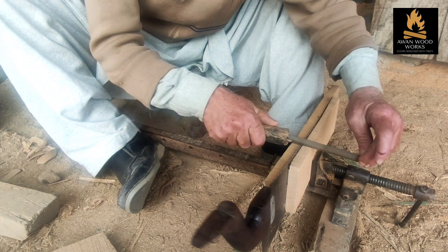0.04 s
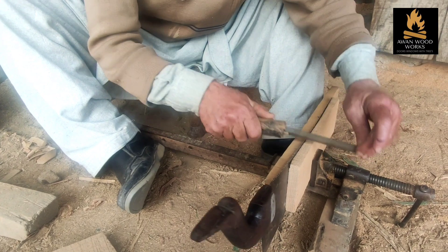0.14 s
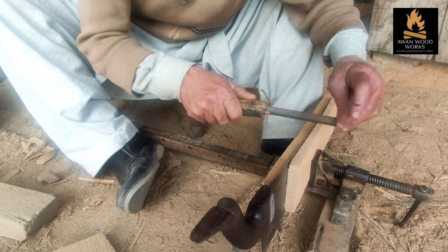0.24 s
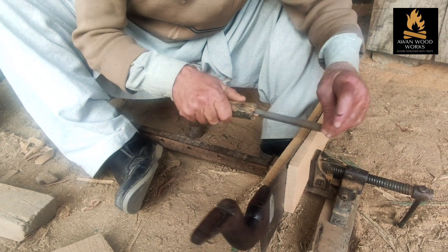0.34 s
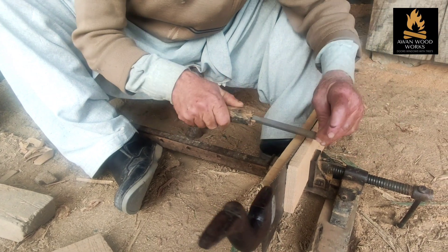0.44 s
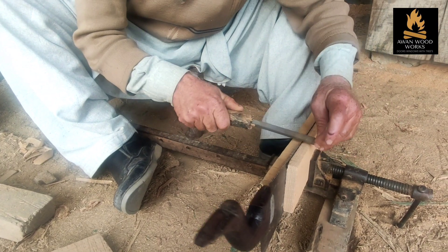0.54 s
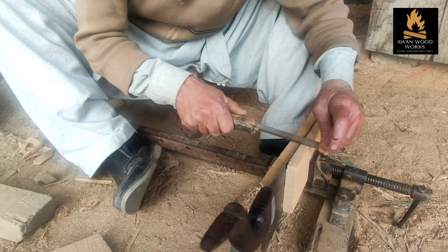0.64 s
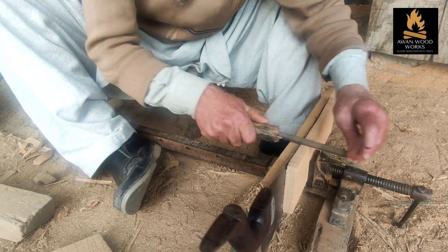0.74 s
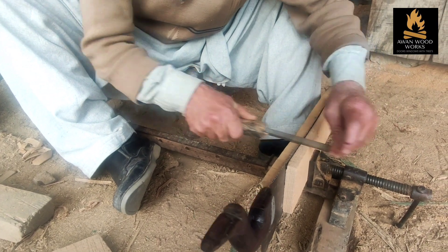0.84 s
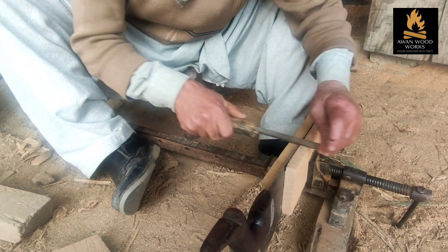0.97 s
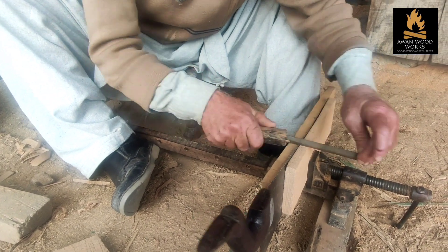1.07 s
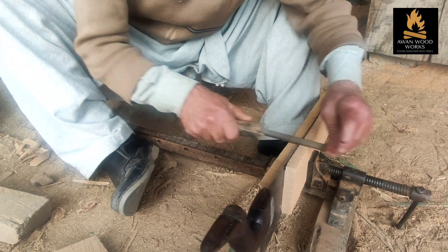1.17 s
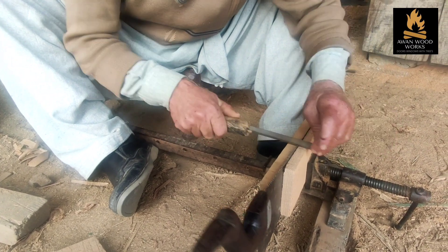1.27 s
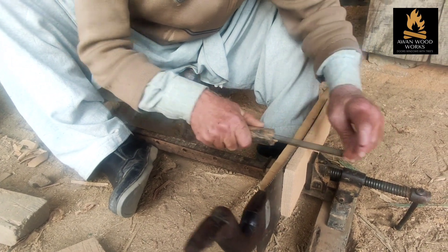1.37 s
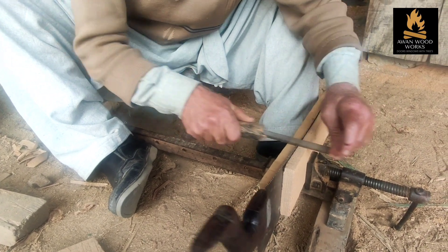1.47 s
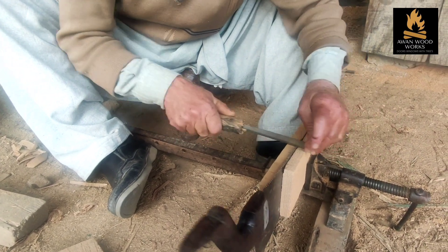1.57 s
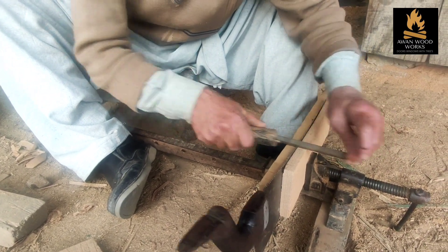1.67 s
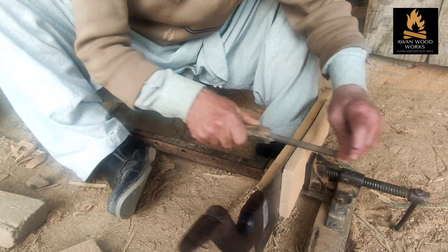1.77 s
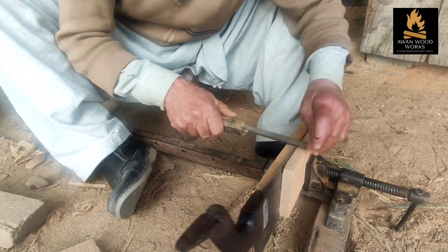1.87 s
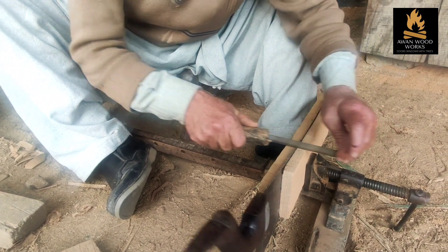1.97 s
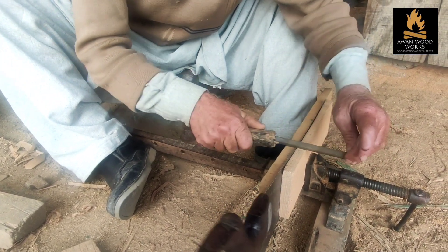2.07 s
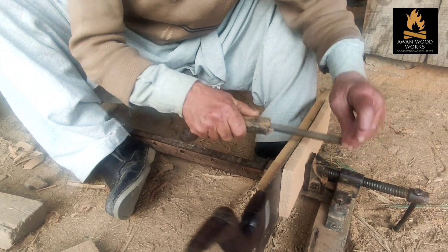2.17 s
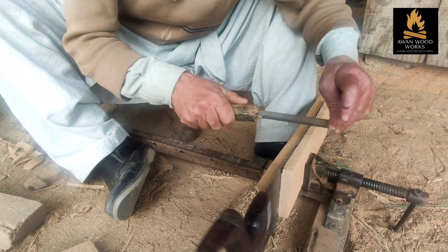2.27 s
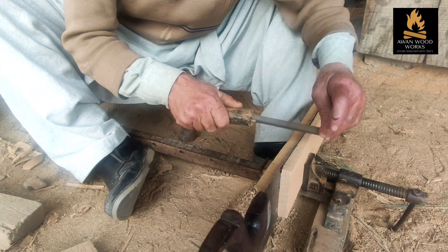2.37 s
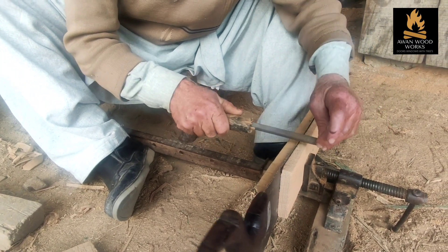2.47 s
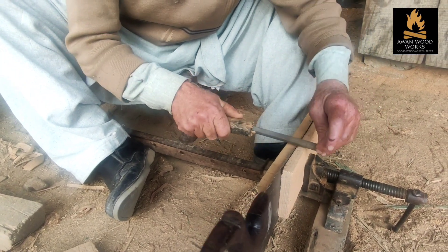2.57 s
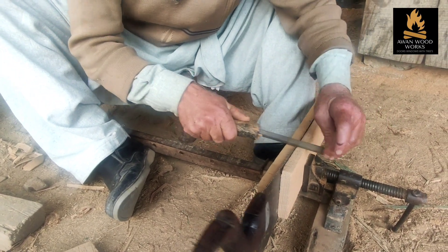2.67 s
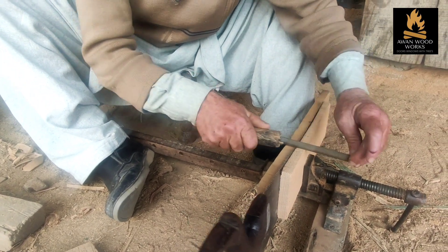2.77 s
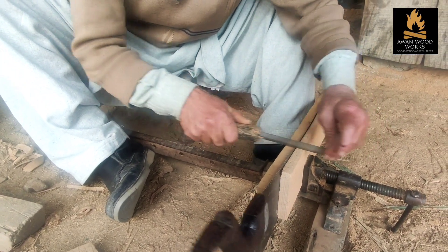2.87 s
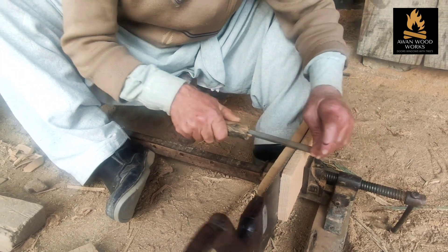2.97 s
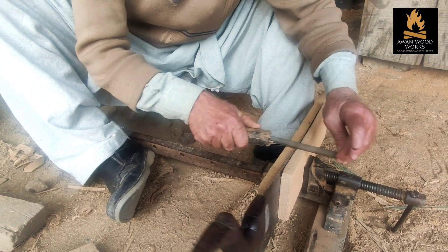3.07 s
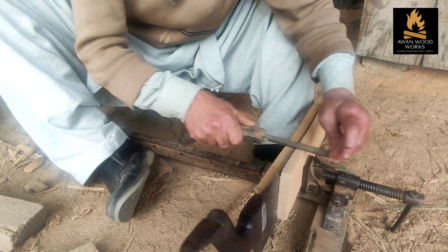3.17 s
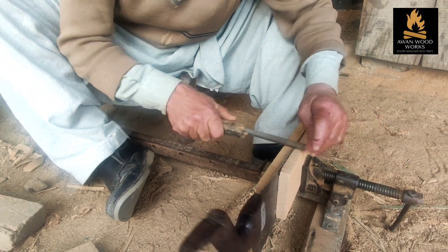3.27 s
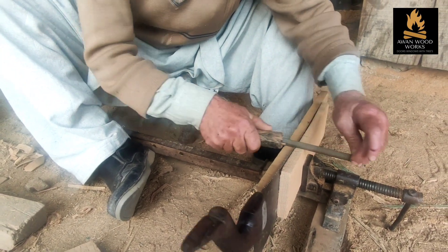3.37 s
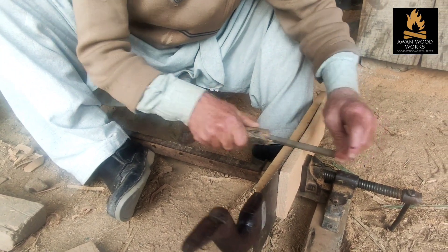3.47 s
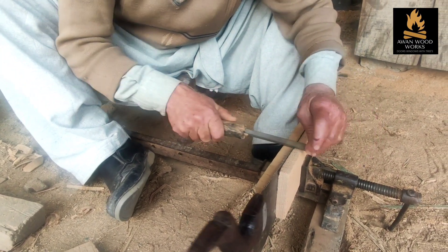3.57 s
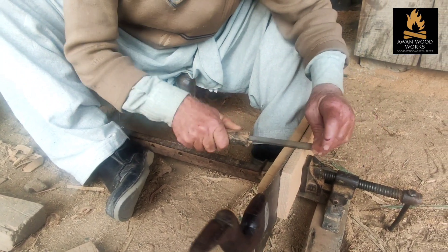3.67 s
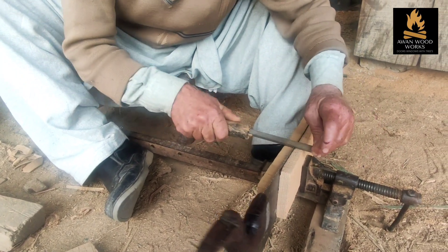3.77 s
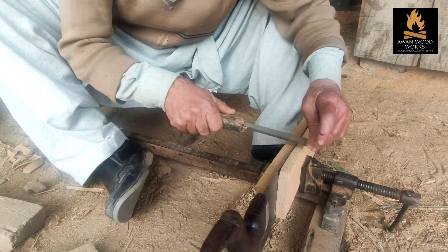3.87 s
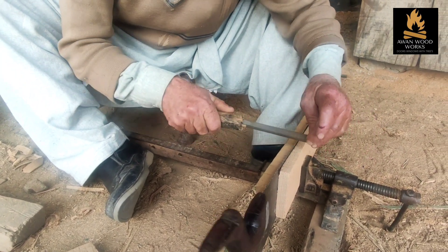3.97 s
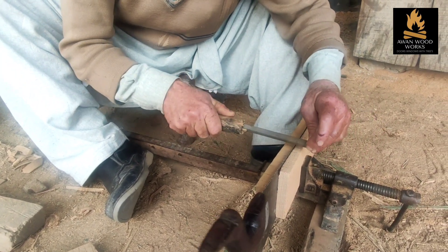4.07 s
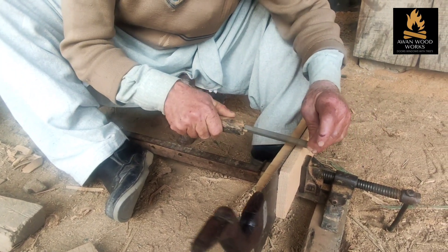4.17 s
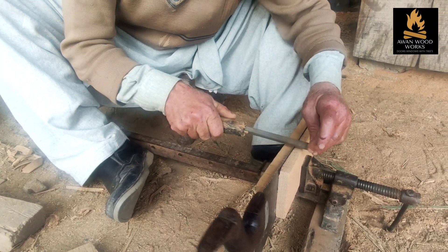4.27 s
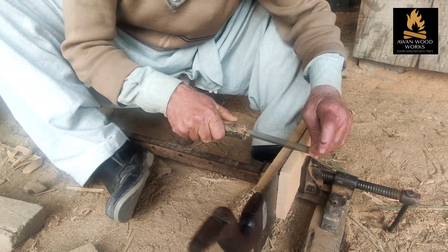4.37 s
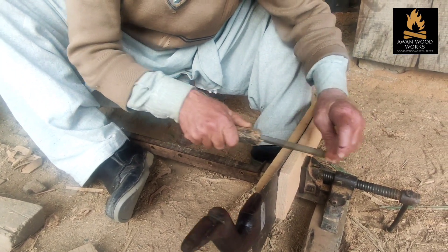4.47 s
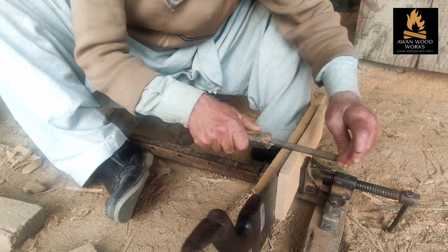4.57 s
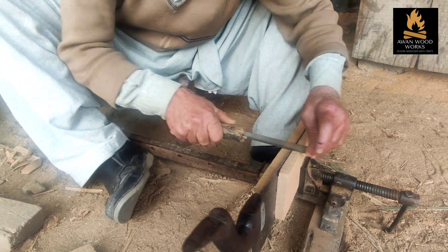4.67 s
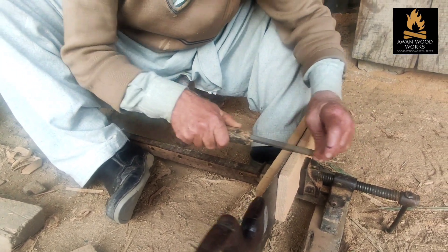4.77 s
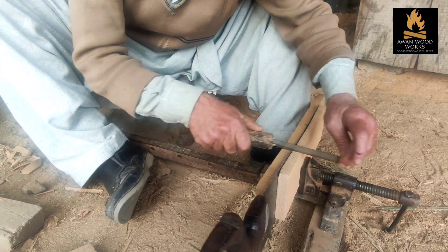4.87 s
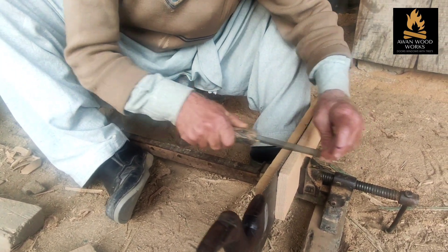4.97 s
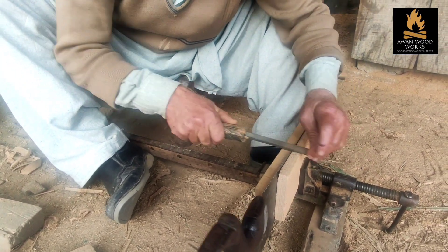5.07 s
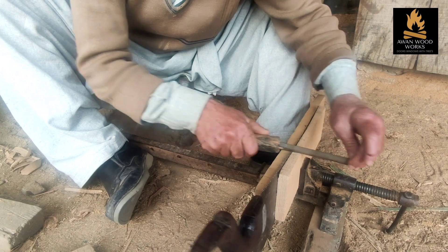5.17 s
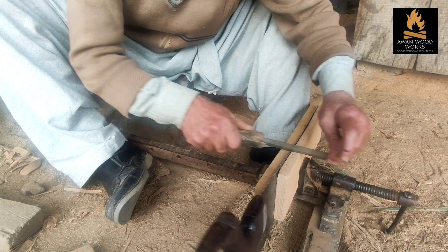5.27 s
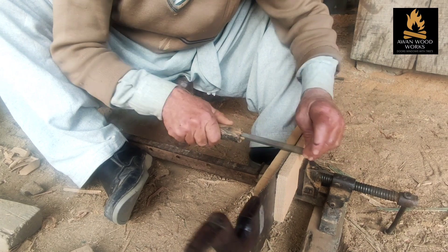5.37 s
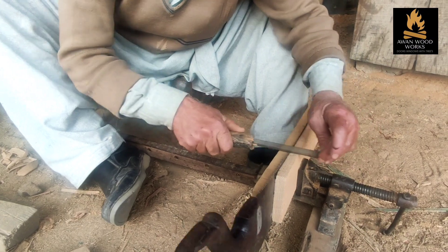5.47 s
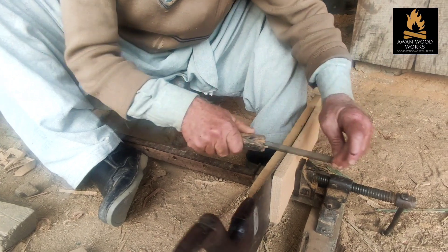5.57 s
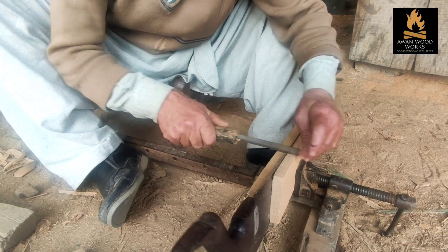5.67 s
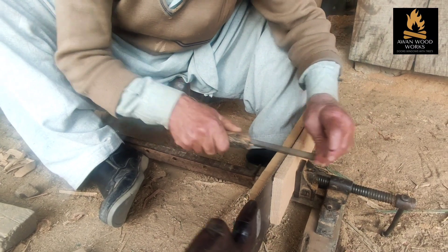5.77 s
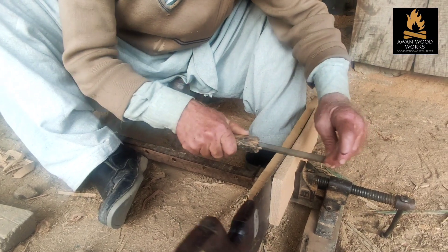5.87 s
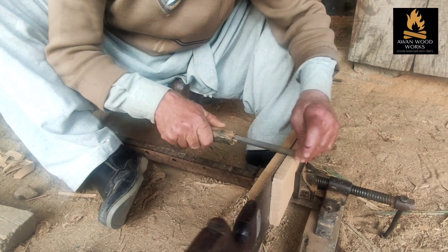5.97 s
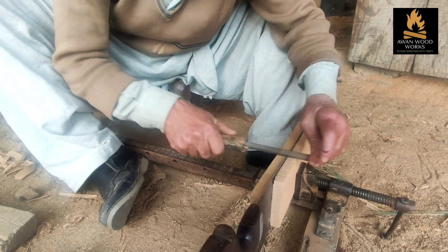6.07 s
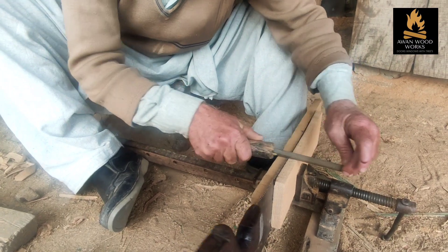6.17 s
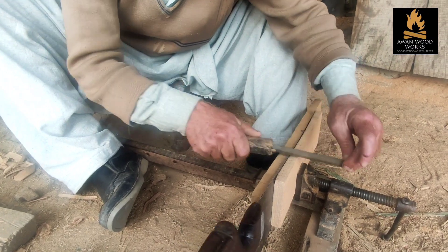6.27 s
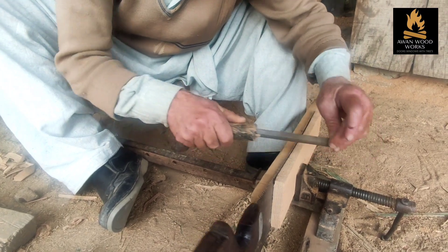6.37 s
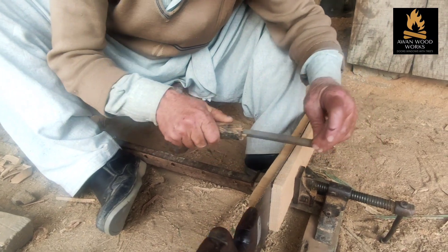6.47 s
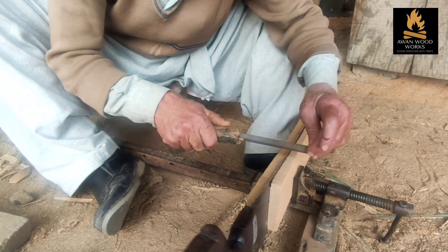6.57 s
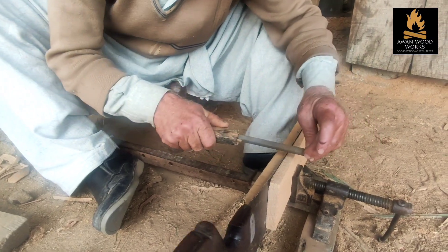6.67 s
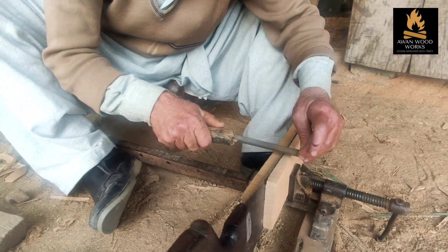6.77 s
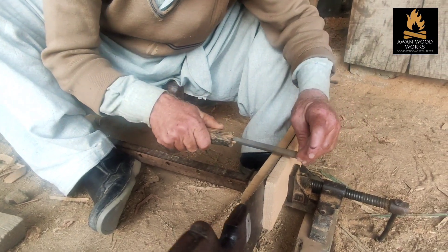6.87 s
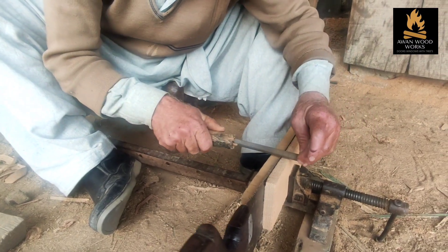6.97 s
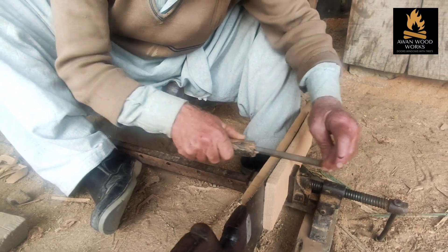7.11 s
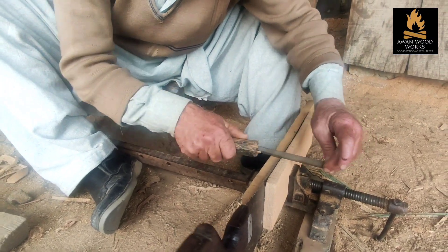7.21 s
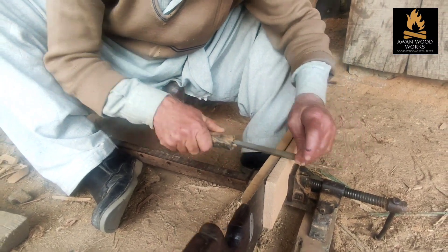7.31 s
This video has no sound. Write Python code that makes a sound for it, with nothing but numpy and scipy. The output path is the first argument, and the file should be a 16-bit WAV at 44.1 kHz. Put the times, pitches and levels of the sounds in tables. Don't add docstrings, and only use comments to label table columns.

```python
import sys
import numpy as np
from scipy import signal
from scipy.fft import rfft, irfft
from scipy.io import wavfile
from scipy.ndimage import uniform_filter1d

SR = 44100
rng = np.random.default_rng(int(sys.argv[2]) if len(sys.argv) > 2 else 0)


def volts_from_decibels(level):
    exponent = np.asarray(level, float) / 20
    return 10 ** exponent


def transcribe(u):
    v = np.clip(np.atleast_2d(u).T, -1, 1)
    q = np.round(v * 32767).astype(np.int16)
    wavfile.write(sys.argv[1], SR, q)


N = 323694
SIZE = 16384


def evened(x):
    return x / np.sqrt(np.mean(abs(x) ** 2) + 1e-20)


def read(points, hz):
    f, value = np.transpose(points)
    return np.interp(np.log(hz + 1), np.log(f + 1), value)


def add(mix, s, sound):
    part = mix[:, max(round(s * SR), 0):][:, :sound.shape[1]]
    part += sound[:, :part.shape[1]]


def wash():
    # (frequency [Hz], density [dB per Hz])
    colour = [(15, -62.5), (35, -36), (60, -11.5), (100, -7.5), (160, 2.5), (221, -18), (313, -5.5),
              (550, -18), (846, -16), (1500, -21.5), (3420, -25.5), (5500, -32), (10000, -37), (15400, -31)]
    # (frequency [Hz], left-right likeness [0 to 1])
    likeness = [(60, 0.23), (140, 0.31), (400, .12), (2000, .02)]
    frames, hz = N // 256 + 5, np.fft.rfftfreq(1024, 1 / SR)
    a, b, c, d, patches = rng.standard_normal((frames, 513, 5)).T
    patches = uniform_filter1d(patches, size=8, axis=0)
    patches = evened(uniform_filter1d(patches, size=14, axis=1))
    same = np.clip(read(likeness, hz), -1, 1)[:, None]
    left, other = a + 1j * b, c + 1j * d
    z = np.array([left, same * left + np.sqrt(1 - same ** 2) * other])
    z *= volts_from_decibels(read(colour, hz)[:, None] + 2.2 * patches)
    noise = signal.istft(z, nperseg=1024, noverlap=768)[1][:, :N]
    return volts_from_decibels(-60.5) * evened(noise)


def knock(db, hz, thud_db, t60=0.029, thud_hz=172, rattle_s=0.017):
    t = np.arange(6000) / SR
    ratios = ((0.91, 0.81), (2.1, 13), (0.65, 6.7), (1.4, 15))  # (share of hz, loss dB)
    modes = sum(volts_from_decibels(-loss) * np.sin(2 * np.pi * hz * m * t) for m, loss in ratios)
    blows = (rng.random((2, 6000)) < .02) * rng.standard_normal((2, 6000)) * np.exp(-t / rattle_s)
    blows[:, 0] = 2
    damped = volts_from_decibels(-60 * t / t60) * modes
    tap = signal.fftconvolve(blows, damped[None], axes=1)[:, :6000]
    thud = np.sin(2 * np.pi * thud_hz * t) * (1 - np.exp(-t / 0.005))
    thud = volts_from_decibels(thud_db + 9.0 - 60 * t / 0.1) * thud
    return volts_from_decibels(db - 5.0) * tap / abs(tap).max() + thud


def far_knocks(mix):
    # (time [s], peak level [dB], mode [Hz], thud level [dB])
    knock_events = [(2.221, -39, 1024, -51), (2.316, -54, 1540, -74), (2.435, -44, 1140, -65),
                    (2.536, -43.5, 1088, -62), (2.653, -45, 1053, -59), (3.932, -28, 1130, -48.5),
                    (3.947, -20, 1100, -39), (4.155, -53, 1120, -68), (3.72, -57, 1100, -49),
                    (5.549, -63, 1097, -35), (5.961, -74, 1080, -44), (6.142, -63, 1090, -38.5),
                    (6.37, -66, 1122, -61)]
    for s, *row in knock_events:
        add(mix, s, knock(*row))


def tick(db, hz, cycles=4.1):
    t = np.arange(200) / SR
    return np.tile(volts_from_decibels(db) * np.sin(2 * np.pi * hz * t) * np.exp(-t * hz / cycles), (2, 1))


def dry_ticks(mix):
    # (time [s], peak level [dB], frequency [Hz])
    tick_events = [
        (6.748, -54, 5500),
        (7.04, -66, 8200),
        (3.935, -36, 2600),
        (2.698, -48, 3000),
    ]
    for s, *row in tick_events:
        add(mix, s, tick(*row))


def catch(db, low_hz, top_hz):
    t = np.arange(900) / SR
    band = signal.butter(3, (low_hz, top_hz), "band", fs=SR, output="sos")
    grit = signal.sosfilt(band, rng.standard_normal((2, 900)))
    return volts_from_decibels(db - 5) * evened(grit) * np.exp(-t / .005)


def ridge_catches(mix):
    # (time [s], peak level [dB], dullest [Hz],
    # brightest [Hz])
    catch_events = [(1.5603, -14, 1500, 15000), (3.0815, -23, 3500, 10000), (3.272, -25, 2000, 8000),
                    (3.553, -17, 1000, 5500), (5.348, -23, 1500, 7000), (5.699, -24, 1500, 8000),
                    (5.9995, -21, 1000, 7000), (1.064, -24, 4000, 12000), (2.939, -20, 1500, 7000),
                    (3.9335, -26, 1200, 4000), (3.9485, -29, 1200, 4500), (3.9425, -35, 1000, 4000),
                    (6.748, -52, 3500, 9000), (7.1215, -27, 1200, 6000), (4.157, -54, 800, 3000),
                    (.741, -25, 1200, 6000),
                    (2.6975, -43, 1000, 9000), (4.697, -26, 5000, 15100), (4.842, -21, 2500, 12160),
                   (3.655, -14, 1500, 5070), (0.759, -23, 1000, 5050), (.9492, -11, 1000, 6000),
                   (1.0779, -18.5, 1000, 6120), (1.8776, -23, 800, 2940), (2.7232, -38, 1000, 5000),
                   (2.7487, -24, 1000, 5000), (2.8055, -16, 2000, 6000), (3.02, -10, 2020, 6130),
                   (3.717, -19, 2000, 11920), (4.504, -41, 1000, 3000), (4.5406, -21, 1000, 6000),
                   (4.7091, -16, 1000, 4000), (4.9696, -14.5, 1000, 5030), (5.0676, -25, 1000, 6000),
                   (5.191, -18, 1000, 5900), (5.842, -8.5, 1000, 6030), (6.134, -20, 1000, 6000),
                   (7.0863, -45.5, 1000, 3000), (7.103, -41, 1000, 4030), (7.188, -22, 1000, 6000)]
    for s, *row in catch_events:
        add(mix, s, catch(*row))


def squeal(db, hz, length_s, width_share=0.08, climb=0.076, rise_s=0.0023, steady=0.63,
           throb=0.21, throb_hz=140, size=8820):
    t = np.arange(0, 2 * length_s, 1 / SR)[:size]
    r = np.exp(-np.pi * width_share * hz / SR)
    fuzz = rng.standard_normal((2, size)) + 1j * rng.standard_normal((2, size))
    fuzz = signal.lfilter([1], [1, -2 * r, r * r], fuzz)
    fuzz = evened(fuzz[:, -len(t):] + 0j)
    turns = hz * np.cumsum(1 + climb * (np.minimum(t / length_s, .8) - .4)) / SR
    shape = (1 - np.exp(-t / rise_s)) ** 2 * np.exp(-(t / length_s) ** 1.4 * 2.0)
    shape = shape * (1 + throb * np.sin(2 * np.pi * throb_hz * rng.uniform(0.68, 0.82) * t))
    return volts_from_decibels(db - 3.5) * shape * ((fuzz + steady) * np.exp(2j * np.pi * turns)).real


def whistles(mix):
    # (time [s], peak level [dB], frequency [Hz], length [s])
    whistle_events = [
        (6.56, -63, 861, .3),
        (6.78, -65, 850, .18),
        (6.58, -64, 1770, .2),
        (6.8, -64, 1450, .15),
        (6.72, -66, 3010, .17),
        (6.74, -69, 2730, .2),
        (6.36, -58, 2150, .1),
        (7.02, -62, 3010, .06),
        (0.3, -67, 860, .2),
        (6.39, -55, 3230, .1),
    ]
    for s, *row in whistle_events:
        add(mix, s, squeal(*row, width_share=0.022, climb=0.0074, rise_s=0.014, throb=0, size=28000))


def chatter(mix):
    # (time [s], peak level [dB], frequency [Hz], length [s])
    low_squeals = [(0.0, -17, 3416, 0.059), (1.075, -9, 3400, 0.061), (1.3997, -7, 3490, 0.05),
                   (1.715, -9, 3272, 0.06), (2.028, -10, 3400, 0.055), (3.085, -10, 3590, 0.057),
                   (3.406, -8.5, 3550, 0.062), (5.189, -11, 3490, 0.05), (5.5057, -7, 3730, 0.041),
                   (5.8452, -12, 3405, 0.05), (6.14, -14, 3570, 0.05)]
    mid_squeals = [
        (3.43, -16, 5400, .05),
        (0.0, -12, 5330, 0.05),
        (1.7201, -11, 4750, 0.05),
        (3.088, -11, 5416, 0.065),
        (4.8765, -16, 5360, 0.05),
        (5.5416, -14.5, 5430, 0.05),
        (5.85, -15, 5015, 0.04),
    ]
    high_squeals = [
        (0.0, -8, 8760, 0.043),
        (1.3966, -13, 8830, 0.088),
        (1.717, -14, 7840, 0.08),
        (3.1017, -10.5, 8410, 0.064),
        (4.857, -14.5, 8530, 0.083),
        (5.201, -18, 7940, 0.073),
        (5.5098, -14, 8935, 0.052),
        (5.868, -24, 7420, 0.039),
        (6.1614, -11, 8940, 0.041),
    ]
    upper_squeals = [
        (3.095, -25, 10700, .04),
        (3.085, -18, 9250, .03),
        (6.4, -56, 3220, .08),
    ]
    stall_squeals = [
        (3.715, -7, 3660, .035),
        (3.716, -11, 5450, .04),
        (3.715, -8, 8700, .032),
        (3.75, -33, 5500, .05),
        (3.706, -17, 1700, .035),
        (3.716, -19, 10850, .04),
        (3.716, -20, 12800, .035),
    ]
    rough_squeals = [(3.008, -7.5, 4000, 0.019), (2.028, -12, 3600, .04), (7.08, -37.5, 1450, 0.041),
                     (5.8, -36, 1400, 0.038), (3.635, -22, 590, 0.037), (0.021, -11, 3700, .05),
                     (1.095, -9.5, 3200, 0.059), (2.05, -9, 3800, .05), (3.423, -10.5, 4000, .06),
                     (7.192, -5.5, 5100, 0.05), (7.195, -10.5, 1252, 0.045)]
    afterglow = [
        (3.759, -41, 8640, 0.074),
        (3.76, -48, 10900, 0.073),
        (3.76, -48, 12800, .07),
        (3.769, -50, 7030, 0.12),
        (3.94, -49, 8770, 0.035),
    ]
    for s, *row in upper_squeals + low_squeals + mid_squeals + high_squeals:
        add(mix, s, squeal(*row))
    for s, *row in stall_squeals:
        add(mix, s, squeal(*row, climb=0, rise_s=.001, width_share=.05, throb=.5, throb_hz=115))
    for s, *row in rough_squeals + afterglow:
        add(mix, s, squeal(*row, width_share=0.24))


def dying_noise(t60_table, delay_s):
    hz, t, z = signal.stft(rng.standard_normal((2, SIZE)), SR, nperseg=128)
    decay = volts_from_decibels(-60 * t / read(t60_table, hz)[:, None])
    burst = signal.istft(z * decay, SR, nperseg=128)[1][:, :SIZE]
    spectra = rfft(np.roll(burst, round(delay_s * SR), axis=1))
    return spectra / np.sqrt(uniform_filter1d(abs(spectra) ** 2, size=50, axis=1))


def body(room_db=-20, room_t60=0.03):
    # (frequency [Hz], density [dB per Hz])
    colour = [(24, -71), (40, -50), (123, -44.5), (178, -19.5), (279, -24.5), (416, -12), (600, -11.5),
              (879, -12.5), (995, -6.5), (1560, -5), (1900, -4.5), (3370, -1.5), (5150, -2.5), (5690, -3.5),
              (8480, -9.5), (15400, -21.5)]
    # (frequency [Hz], width [Hz], level [dB])
    board_modes = [(195, 300, -7), (317, 20, 1.5), (419.7, 22, 6), (506, 22, 3), (622, 89, 2.5),
                   (1029, 59, 3.5), (1150, 62, -1), (1325, 280, 3), (1548, 40, 10), (1625, 110, 3.5),
                   (1750, 67, 2)]
    # (frequency [Hz], width [Hz], level [dB])
    steel_modes = [(2424, 76, 5), (2930, 140, 5), (3103, 90, 0), (3307, 60, 2), (3740, 880, 1),
                   (4660, 170, 1.5), (4990, 110, 3.5), (5270, 81, 8.5), (5990, 30, 3.5), (6390, 110, -2.5),
                   (7880, 110, 4), (8380, 120, 4), (10040, 410, -6), (11450, 90, 1.5)]
    # (frequency [Hz], width [Hz], level [dB])
    valleys = [(203, 43, -6), (378, 72, -6.5), (301, 5.1, -13), (870, 510, -1.5), (1874, 65, -7),
               (4140, 220, 0), (5770, 690, -5), (7000, 120, -6), (9250, 32, -0.5), (11220, 260, -7)]
    # (frequency [Hz], t60 [s])
    ring_t60 = [(200, 0.16), (1500, 0.096), (5000, 0.068), (12000, 0.031)]
    # (frequency [Hz], left-right likeness [0 to 1])
    likeness = [(60, 0.29), (150, 0.94), (380, 0.96), (950, 0.31), (2380, 0.19), (5970, 0.39),
                (15000, 0.93)]
    # (frequency [Hz], left minus right [dB])
    tilt = [(60, 3.5), (120, -8.5), (240, 4), (480, 2.5), (950, 2), (1890, 1.5), (3770, 0.5), (7510, -1),
            (15000, 3)]
    wander, narrowest_hz = .025, 18
    direct_db, direct_from_hz, lag_s = -1, 700, [5.5e-5, 0]
    hz = np.fft.rfftfreq(SIZE, 1 / SR)
    ring = dying_noise(ring_t60, 0)
    for f, width, db in board_modes + steel_modes:
        phase = rng.uniform(0, 2 * np.pi, (2, 1))
        spot_db = 2.5 * rng.standard_normal()
        f = f * (1 + wander * np.clip(f / 1500, 0, 1) * rng.standard_normal())
        resonance = 1 / (1 + 2j * (hz - f) / max(width, narrowest_hz))
        ring = ring + volts_from_decibels(db + spot_db) * np.exp(1j * phase) * resonance
    ring = ring + volts_from_decibels(room_db) * dying_noise([(100, room_t60), (15000, 0.25 * room_t60)], 0.0036)
    same = np.clip(read(likeness, hz), 0, 1)
    ring = np.array([ring[0], same * ring[0] + np.sqrt(1 - same ** 2) * ring[1]])
    direct = volts_from_decibels(direct_db) / (1 + (direct_from_hz / (hz + 1)) ** 4)
    ring = ring + direct * np.exp(-2j * np.pi * np.outer(lag_s, hz))
    for f, width, db in valleys:
        ring = ring * volts_from_decibels(db * np.exp(-((hz - f) / width) ** 2))
    return hz, ring * volts_from_decibels(read(colour, hz) + np.outer([.5, -.5], read(tilt, hz)))


def stroke(start_s, hold_s, bite_s, lift_db_per_s, held_db):
    lift_shares = (1.1, 1.1, 1.9, 2.8)
    at_once = 0.28
    t = np.arange(0, hold_s + .15, 1 / SR)
    bite = at_once + (1 - at_once) * np.sin(np.pi / 2 * np.minimum(t / bite_s, 1)) ** 2
    lift_db = -lift_db_per_s * np.outer(lift_shares, np.maximum(t - hold_s, 0))
    gain = bite * volts_from_decibels(held_db(np.minimum(t / hold_s, 1)) + lift_db)
    return start_s, gain[:, max(-round(start_s * SR), 0):] ** 2


def pressure():
    # (bite [s], hold [s], pressure [dB], sag over the hold [dB], lift [dB per s])
    pushes = [(-0.02, 0.17, -26, 13.5, 900.5), (1.066, 0.136, -23, 10, 603),
              (1.388, 0.13, -23.5, 16, 694.5), (1.705, 0.13, -22.5, 11, 502), (2.016, 0.12, -24, 16, 518),
              (3.082, 0.16, -25.5, 8.5, 1198), (3.387, 0.13, -23, 10.5, 797),
              (3.689, 0.042, -26.5, -12, 607), (4.846, 0.1, -24.5, 2.5, 902), (5.184, 0.11, -22.5, 7, 594),
              (5.504, 0.15, -23.5, 7.5, 1198), (5.835, 0.1, -24, 17, 541), (6.127, 0.084, -22, 16, 491),
              (7.185, 0.098, -26, 9.5, 912), (7.322, 0.24, -26, -10.5, 700)]
    # (bite [s], hold [s], pressure [dB], swell [dB], brightness [dB])
    draws = [(0.078, 0.062, -25.5, 4.5, 4), (0.737, 0.15, -21.5, 15, 2.5), (0.924, 0.11, -20, 9, 1.5),
             (1.223, 0.13, -20, 12, 1), (1.559, 0.12, -21.5, 5.5, 0.5), (1.86, 0.12, -20, 8.5, 0),
             (2.739, 0.15, -23.5, 36, 2.5), (2.928, 0.11, -20, 9, 0.5), (3.272, 0.092, -22.5, 2, 1),
             (3.551, 0.12, -21, 6.5, 0.5), (4.531, 0.12, -22.5, 2.5, 1.5), (4.685, 0.15, -23.5, 11.5, 0.5),
             (4.958, 0.052, -20, -1, 1), (5.051, 0.1, -20.5, 8.5, 1.5), (5.343, 0.12, -20.5, 6.5, 1),
             (5.696, 0.12, -22, 4.5, -0.5), (5.995, 0.11, -21.5, 12.5, 0), (6.215, 0.11, -23.5, 2, -1)]
    # (start [s], length [s], first [dB], last [dB], brightness [dB])
    touches = [(5.94, 0.0484, -41.5, -56, 3), (1.37, .02, -35.5, -33, 1), (0.175, 0.19, -46.5, -79.5, 0.5),
               (0.696, 0.054, -56.5, -38.5, 0), (2.154, 0.11, -55, -72, 5), (2.267, 0.07, -65, -66, 0),
               (2.695, 0.074, -47.5, -27.5, -0.5), (3.775, 0.15, -59, -73, 3.5),
               (3.92, 0.041, -47, -38.5, -3.5), (3.989, 0.077, -77, -68, -3.5),
               (4.491, 0.038, -54.5, -40.5, 0.5), (4.841, 0.0086, -32, -44, 4),
               (6.328, 0.21, -37, -89.5, 3), (6.58, 0.21, -73.5, -71, -2), (6.752, 0.201, -71.5, -65.5, -3),
               (7.074, 0.055, -57, -32, -1), (7.121, 0.1, -41.5, -16, -0.5)]
    # (clamp, boards, blade, file); colours [dB], the others shares [ratio]
    push_colour = (-8, 1.66, 4, 2.72)
    push_sag = (-0.079, 0.7, 1, 0.91)
    draw_colour = (-6.5, 1.7, 3, -2)
    draw_swell = (0.55, 1.2, 1.7, 1.8)
    draw_bright = (-1.4, 1.5, 2, 1.8)
    touch_colour = (-14.5, 1.5, -1.5, -10.5)
    touch_bright = (-3, 0.5, 1.72, 3)
    top, droop_db = 0.63, 2.5
    power = np.full((4, N), 1e-11)

    for s, hold_s, db, sag_db, lift in pushes:
        def push_db(u):
            return db + np.reshape(push_colour, (4, 1)) + sag_db * np.outer(push_sag, .5 - u)
        add(power, *stroke(s, hold_s, 0.012, lift, push_db))

    for s, hold_s, db, swell_db, bright_db in draws:
        def draw_db(u):
            colour_db = np.reshape(draw_colour, (4, 1)) + bright_db * np.reshape(draw_bright, (4, 1))
            swell = swell_db * np.outer(draw_swell, np.maximum(1 - u / top, 0) ** 2)
            droop = droop_db * (np.maximum(u - top, 0) / (1 - top)) ** 2
            return db + colour_db - swell - droop
        add(power, *stroke(s, hold_s, .0025, 899.5, draw_db))

    for s, hold_s, first_db, last_db, bright_db in touches:
        def touch_db(u):
            colour_db = np.reshape(touch_colour, (4, 1)) + bright_db * np.reshape(touch_bright, (4, 1))
            return colour_db + first_db + (last_db - first_db) * u
        add(power, *stroke(s, hold_s, 0.0026, 746.5, touch_db))
    return np.sqrt(power)


def rasp(clicks_per_s=9000, spread_db=3.0, judder_db=1.0, grit_db=1.5, slide_per_s=7.0,
         alike=(.9, .8, .62, .5)):
    hits = rng.random((2, N)) < clicks_per_s / SR
    clicks = hits * volts_from_decibels(spread_db * np.minimum(rng.exponential(1, (2, N)), 5))
    judder = uniform_filter1d(rng.standard_normal(N), size=300)
    judder = evened(uniform_filter1d(judder, size=300))
    grit = evened(uniform_filter1d(rng.standard_normal(N), size=60))
    signs = rng.choice([-1, 1], (2, N))
    near, far = evened(clicks * signs * volts_from_decibels(judder_db * judder + grit_db * grit))
    slide = np.pi * slide_per_s * np.arange(N) / SR
    gains, out = pressure(), np.zeros((2, N))
    for spot in range(4):
        hz, response = body()
        share = np.sqrt(2 / 4) * np.cos(slide - spot * np.pi / 4)
        deep, low, high = (1 / (1 + (hz / edge_hz) ** 12) for edge_hz in (850, 2100, 5700))
        bands = (deep, low - deep, high - low, 1 - high)
        for gain, band, same in zip(gains, bands, np.clip(alike, 0, 1)):
            drive = np.array([near, same * near + np.sqrt(1 - same ** 2) * far]) * share * gain
            taps = np.roll(irfft(evened(response * band)), 768, axis=1)[:, :SIZE // 2]
            out += signal.oaconvolve(drive, taps, axes=1)[:, 768:N + 768]
    return out


def scene():
    mix = wash()
    far_knocks(mix)
    whistles(mix)
    dry_ticks(mix)
    ridge_catches(mix)
    chatter(mix)
    return mix + rasp()


def starved(x, from_hz=1500, edge_hz=15150, patchy_db=2.5):
    # (frequency [Hz], width [Hz], lost margin [dB])
    weak_bands = [(5800, 250, 0), (8900, 200, 1.5), (11250, 330, 7), (12900, 1600, 5.5)]
    margin_db, chance_db, lean_db = 8.5, 3.2, 2.3
    hz, t, z = signal.stft(x, SR, nperseg=1024, noverlap=768)
    column_hz = hz[:, None]
    blocks = rng.standard_normal((len(t) // 4 + 1, len(hz) // 6 + 1)).T
    blocks = evened(uniform_filter1d(blocks, size=3, axis=1))
    chance = np.kron(blocks, np.ones((6, 4)))[:len(hz), :len(t)]
    drift = rng.standard_normal((len(t), len(hz))).T
    drift = uniform_filter1d(drift, size=9, axis=0)
    drift = evened(uniform_filter1d(drift, size=14, axis=1))
    power = uniform_filter1d((abs(z) ** 2).sum(0), size=5, axis=0)
    power = uniform_filter1d(power, size=10, axis=1) + 1e-16
    dip_db = 10 * np.log10(power / uniform_filter1d(power, size=40, axis=0))
    treble = np.clip(.62 * np.log2((column_hz + 1) / from_hz), 0, 2.2)
    weak_db = sum(db * np.exp(-((column_hz - f) / width) ** 2) for f, width, db in weak_bands)
    kept = dip_db - weak_db + margin_db + treble * (chance_db * chance - lean_db) > 0
    kept = (kept | (treble == 0)) & (column_hz < edge_hz + 110 * chance[:1])
    z = z * (kept + 0.0047) * volts_from_decibels(patchy_db * drift * np.clip(column_hz / 1500, 0, 1))
    return signal.istft(z, SR, nperseg=1024, noverlap=768)[1][:, :N]


def roll_off(x):
    return signal.sosfilt(signal.butter(12, 15830, fs=SR, output="sos"), x)


def record(dry):
    limited = 0.8 * np.tanh(dry / 0.96)
    cut = signal.sosfilt(signal.butter(1, 45, "high", fs=SR, output="sos"), limited)
    return roll_off(starved(cut))


dry = scene()
out = record(dry)
transcribe(out)
```